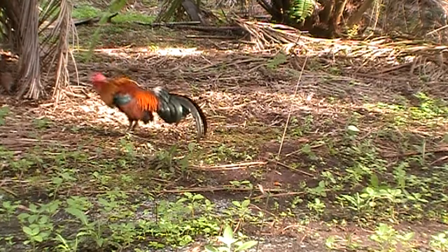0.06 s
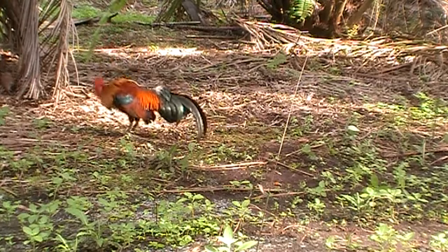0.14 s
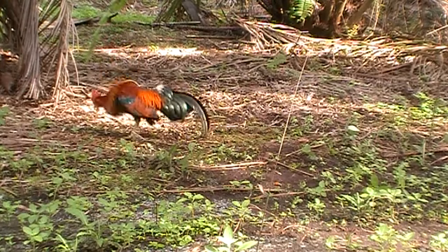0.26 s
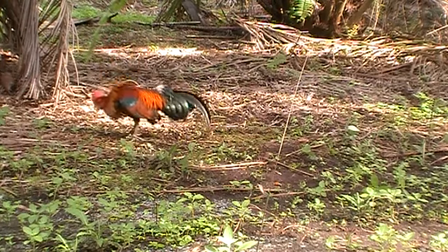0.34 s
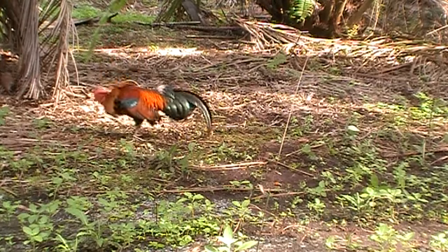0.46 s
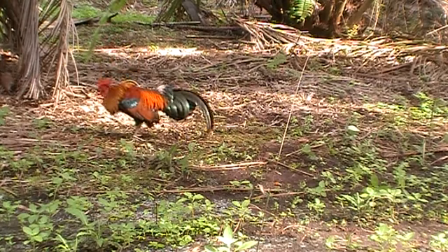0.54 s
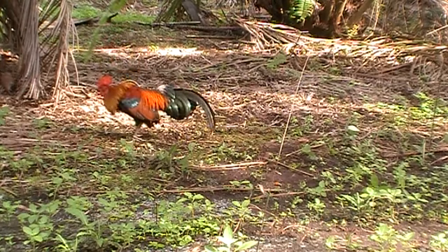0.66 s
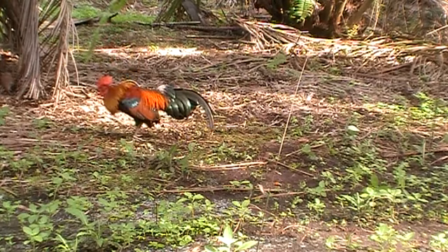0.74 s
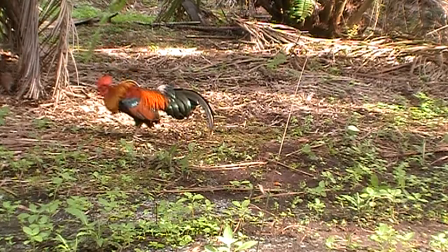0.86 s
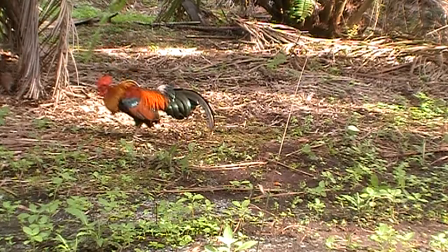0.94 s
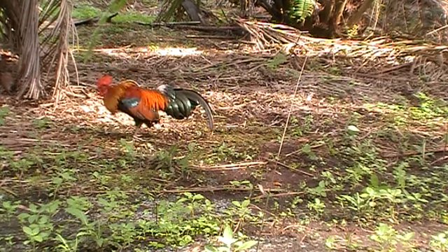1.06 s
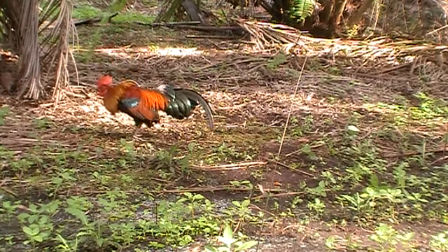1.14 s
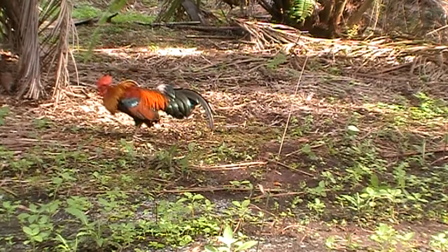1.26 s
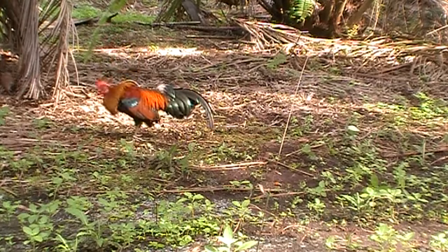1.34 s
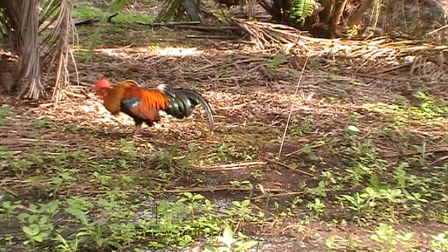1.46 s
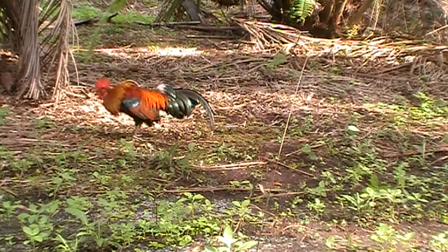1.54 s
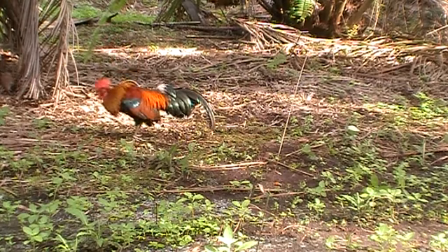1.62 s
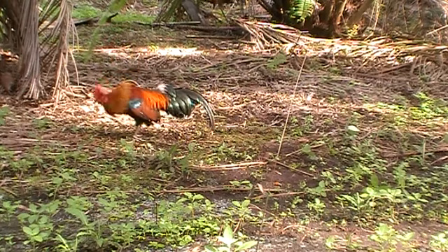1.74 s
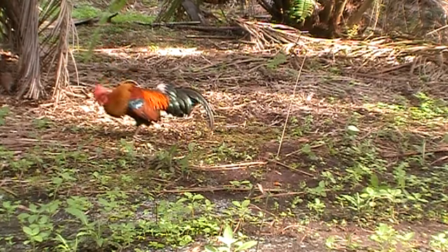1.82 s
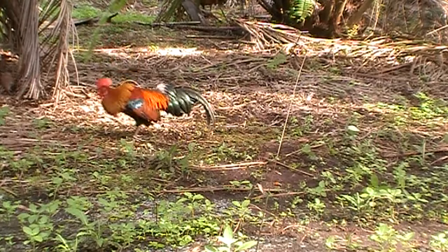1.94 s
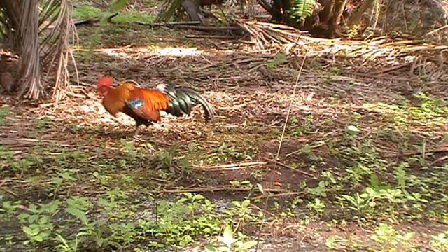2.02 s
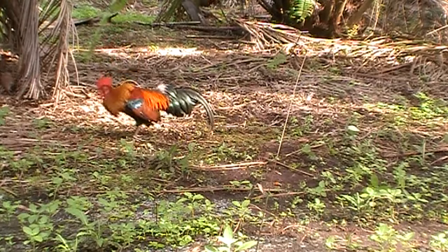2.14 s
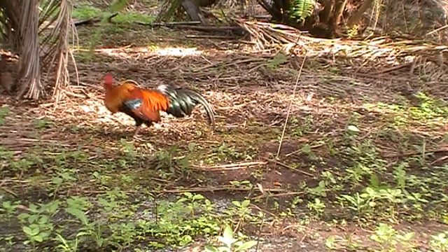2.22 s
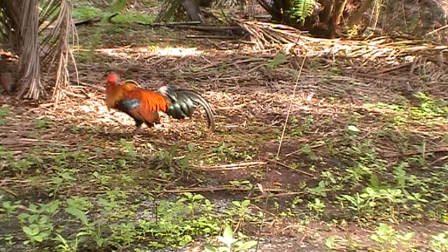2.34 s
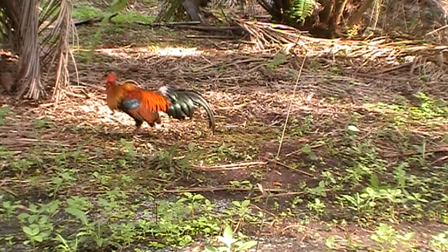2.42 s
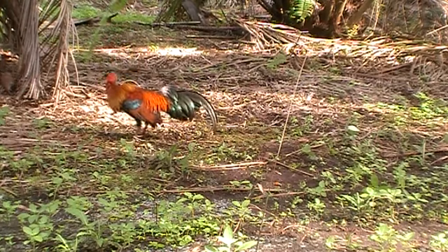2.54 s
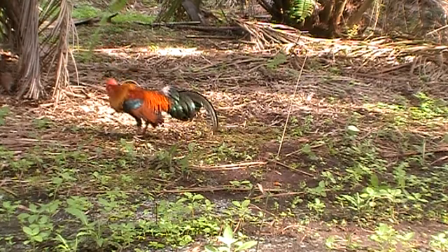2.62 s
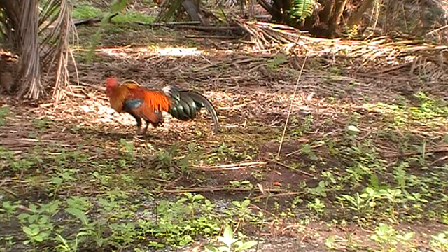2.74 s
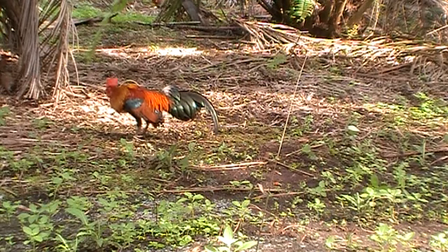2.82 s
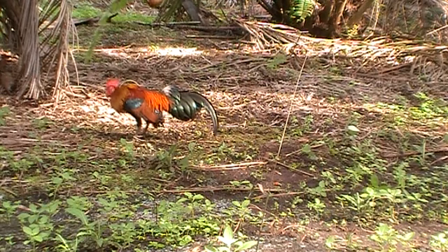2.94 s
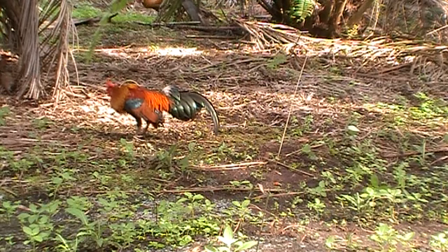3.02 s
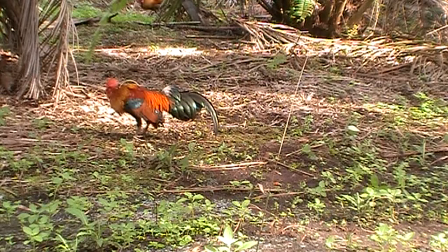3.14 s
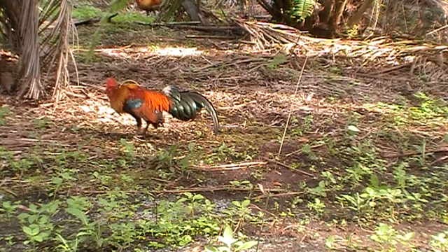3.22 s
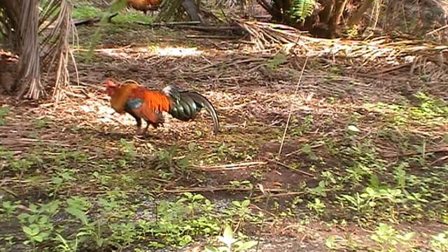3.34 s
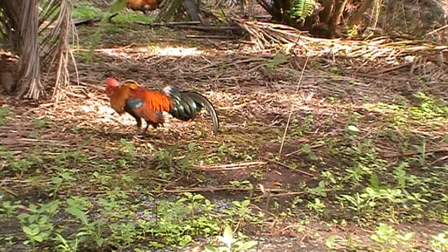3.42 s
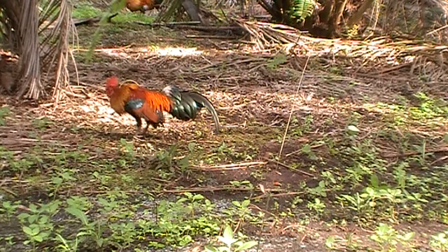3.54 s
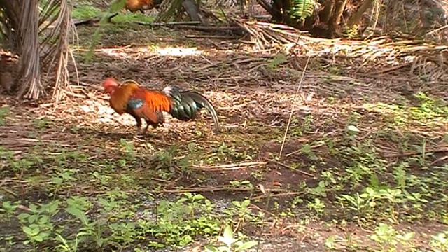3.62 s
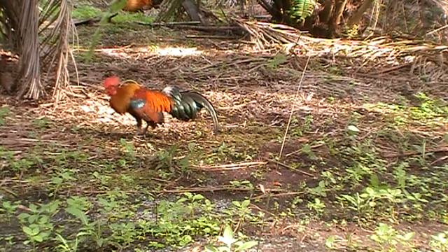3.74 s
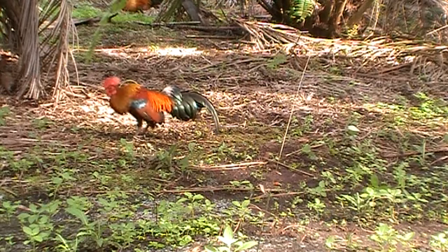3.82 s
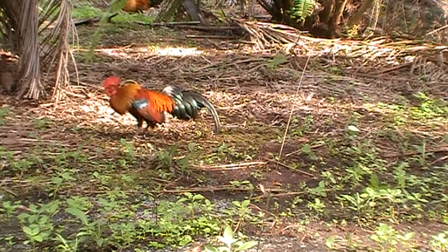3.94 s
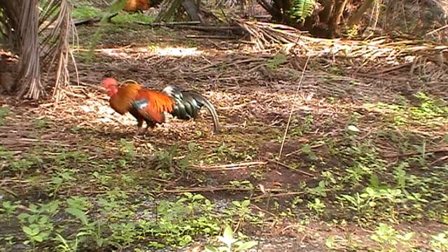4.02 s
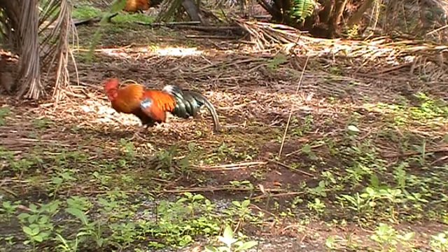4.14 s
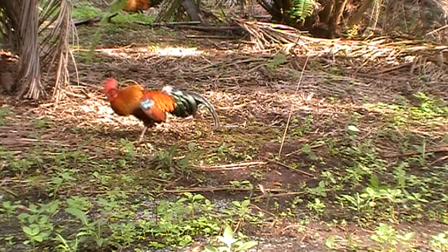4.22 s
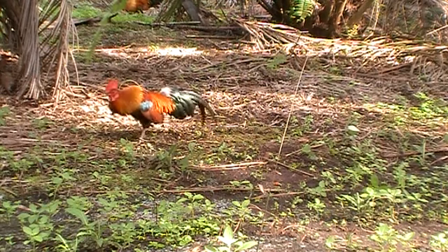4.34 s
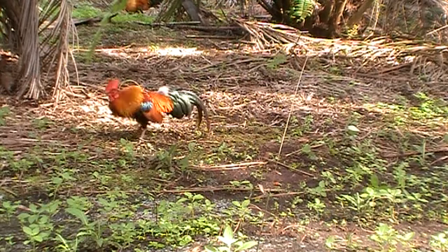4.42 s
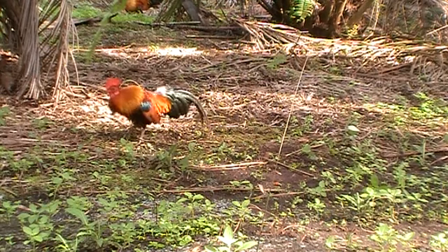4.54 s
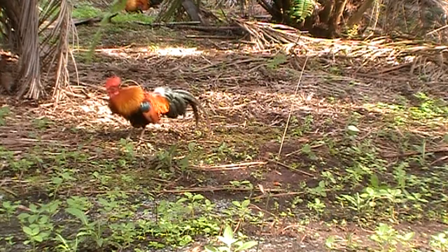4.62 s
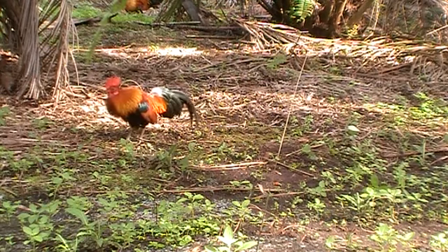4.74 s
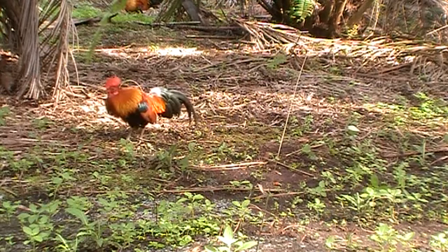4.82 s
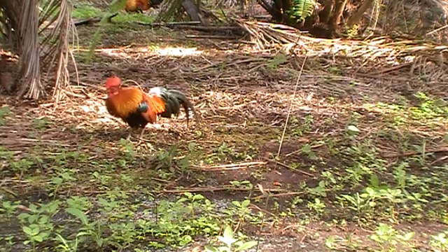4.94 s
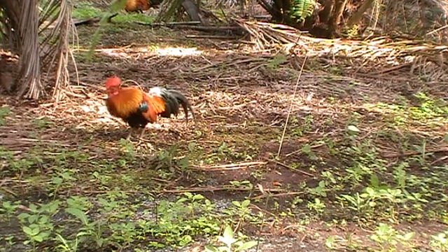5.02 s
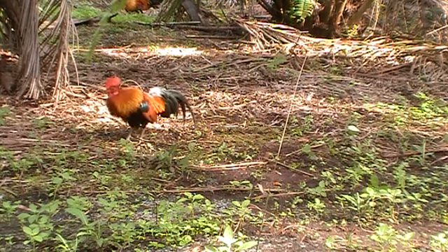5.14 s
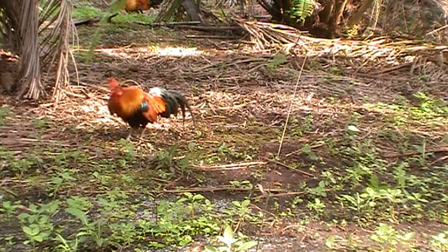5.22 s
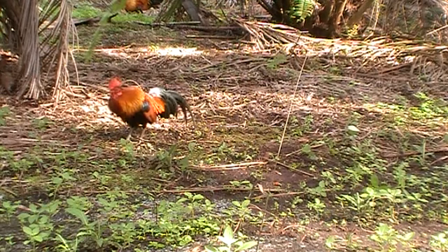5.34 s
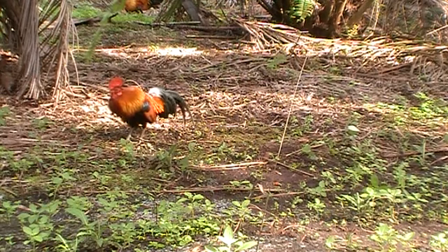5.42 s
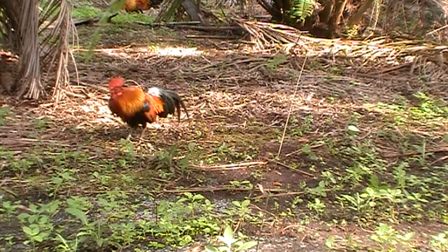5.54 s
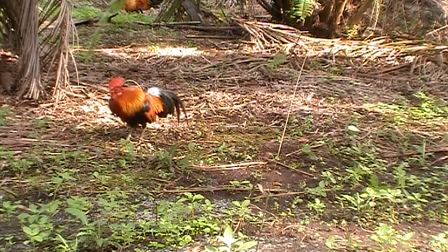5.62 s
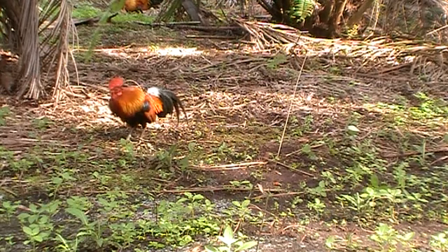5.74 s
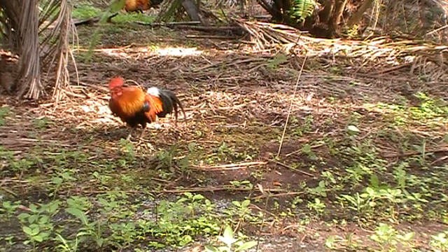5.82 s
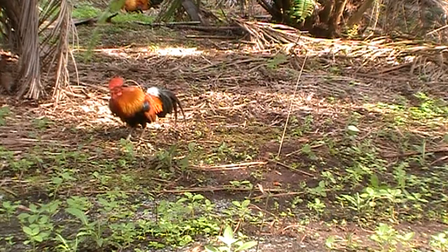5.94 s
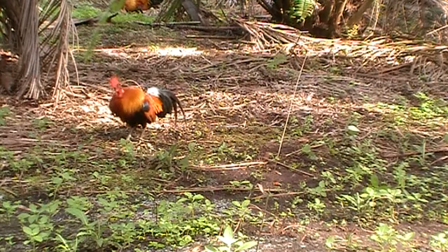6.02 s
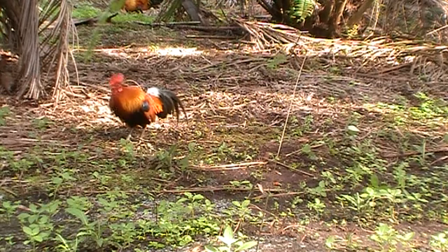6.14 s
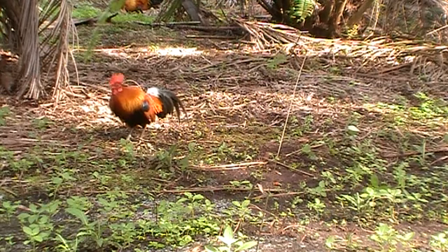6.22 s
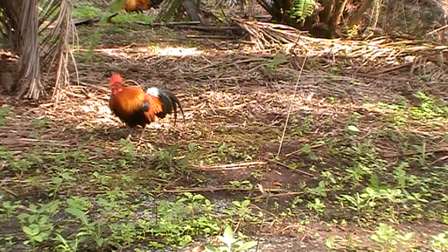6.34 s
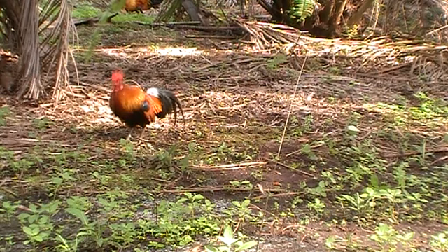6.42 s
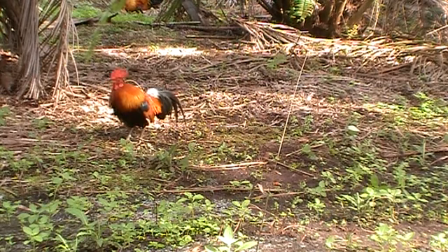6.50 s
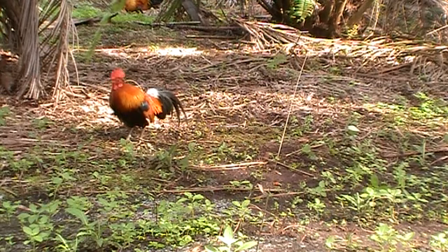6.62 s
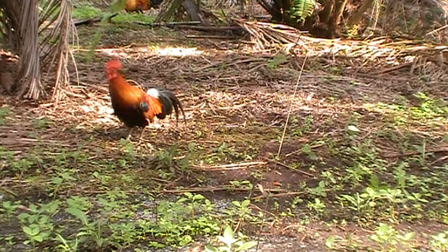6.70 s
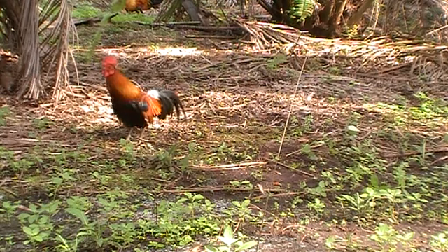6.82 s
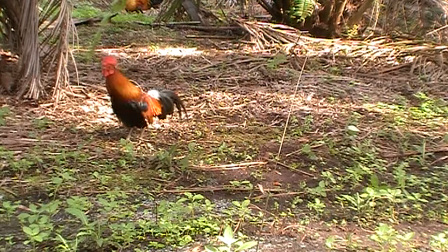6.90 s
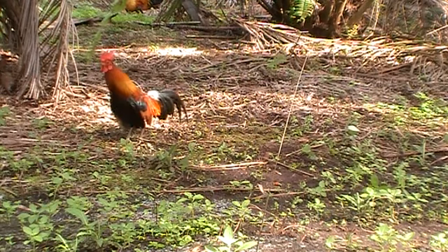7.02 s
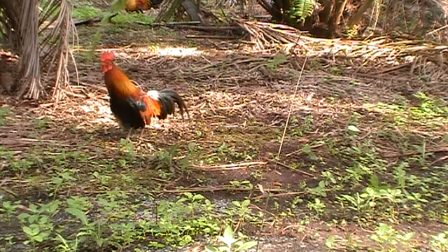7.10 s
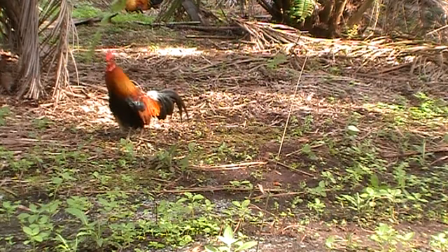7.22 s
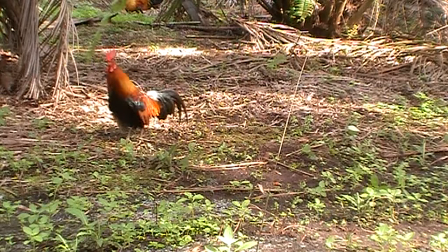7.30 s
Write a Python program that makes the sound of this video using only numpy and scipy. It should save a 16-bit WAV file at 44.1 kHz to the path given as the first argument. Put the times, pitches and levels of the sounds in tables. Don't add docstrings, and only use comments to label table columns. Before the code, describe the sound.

Shrill cicadas and katydids sing in a forest as a dove throbs, leaves crackle, and a nearby rooster clucks, then gives sharp alarm notes.

```python
import sys
import numpy as np
from scipy import signal
from scipy.fft import rfft, irfft
from scipy.io import wavfile
from scipy.ndimage import uniform_filter1d

SR = 44100
rng = np.random.default_rng(int(sys.argv[2]) if len(sys.argv) > 2 else 0)


def voltage_ratio(level):
    return 10 ** (np.asarray(level, float) / 20)


def bounce(signal):
    frames = np.transpose(np.atleast_2d(signal))
    limited = np.clip(frames, -1, 1)
    pcm = np.round(limited * 32767).astype(np.int16)
    wavfile.write(sys.argv[1], SR, pcm)


N = 325017


def rms_one(x):
    return x / np.sqrt(np.mean(x ** 2) + 1e-20)


def in_time(rows):
    s, *columns = np.transpose(rows)
    return [np.interp(np.arange(N) / SR, s, c) for c in columns]


def drift(rate):
    r = np.exp(-80 * np.pi * rate / SR)
    slow = signal.lfilter([1], [1, -2 * r, r * r], rng.standard_normal(N // 40 + 2002))[2000:]
    return np.interp(np.arange(N) / 40, np.arange(len(slow)), rms_one(slow))


def resonance(x, hz, width_hz):
    r = np.exp(-np.pi * width_hz / SR)
    feedback = [1, -2 * r * np.cos(2 * np.pi * hz / SR), r * r]
    return signal.lfilter([(1 - r * r) / 2, 0, (r * r - 1) / 2], feedback, x)


def steep_resonance(x, hz, width_hz):
    return rms_one(resonance(resonance(x, hz, width_hz), hz, 2 * width_hz))


def band(x, low_hz, high_hz):
    return signal.sosfilt(signal.butter(4, [low_hz, high_hz], "band", fs=SR, output="sos"), x)


def add(out, s, sound):
    i = round(s * SR)
    out[i:i + len(sound)] += sound[:N - i]


def place(x, left_db, lag):
    late = irfft(rfft(x) * np.exp(-2j * np.pi * lag * np.arange(N // 2 + 1) / N), N)
    return np.array([late * voltage_ratio(left_db / 2), x * voltage_ratio(-left_db / 2)])


def hump(phase, sharp):
    return (.5 + .5 * np.cos(2 * np.pi * phase)) ** sharp


def notes(tables, fade_s):
    t = np.arange(N) / SR
    gate = sum(np.clip(np.minimum(t - n[0][0], n[-1][0] - t) / fade_s, 0, 1) for n in tables)
    hz, level_db, *_ = in_time([row for n in tables for row in n])
    return hz, gate * voltage_ratio(level_db)


def forest(x, t60):
    t = np.arange(round(.7 * SR)) / SR
    tail = rng.standard_normal((2, len(t))) * voltage_ratio(-60 * t / t60) * (t > .006)
    tail = signal.lfilter([.3], [1, -.7], tail)
    return signal.fftconvolve(x[None], tail / np.sqrt(np.sum(tail ** 2) / 2), axes=1)[:, :N]


def shaped_noise(curve):
    hz, db = np.transpose(curve)
    log_hz = np.log(np.arange(N // 2 + 1) * SR / N + 1)
    return irfft(rfft(rng.standard_normal(N)) * voltage_ratio(np.interp(log_hz, np.log(hz), db)), N)


def air():
    # pitch in Hz, level in dB per Hz.
    alike = [(20, -10), (35, -21), (50, -4), (100, -6.5), (190, -7), (260, -18), (1000, -22.5),
             (2000, -25.5), (3900, -34.5), (4500, -23.5), (5800, -20.5), (6170, -25), (6400, -18),
             (8000, -19), (11300, -16), (12200, -27), (12800, -22), (13700, -11.5), (15500, -23.5)]
    # pitch in Hz, level in dB per Hz.
    opposite = [(20, -39), (50, -9), (100, -14.5), (190, -8), (350, -10.5), (1000, -15.5), (3800, -28.5),
                (4500, -22), (6200, -16), (7600, -47), (8400, -42), (12600, -25), (13700, -7.5),
                (15500, -58)]
    mid, side = shaped_noise(alike), shaped_noise(opposite)
    right_rumble = place(resonance(mid, 72, 61), left_db=-60.0, lag=0) * 0.043
    return voltage_ratio(-50) / np.std(mid) * (np.array([mid + side, mid - side]) + right_rumble)


def breeze():
    # time in seconds, level in dB.
    stirring = [
        (0.0, -66),
        (0.35, -60),
        (5.34, -61),
        (5.81, -55),
        (6.28, -57),
        (6.78, -57),
        (6.82, -52),
        (6.96, -57),
        (7.37, -86),
    ]
    hiss = rms_one(band(rng.standard_normal((2, N)), 2170, 4600))
    return voltage_ratio(in_time(stirring)[0] - 9.0) * hiss


def cicada(noise_db, tone_db):
    # time in seconds, level in dB.
    loudness = [
        (0, -45),
        (2.5, -45),
        (7.37, -44),
    ]
    pulse_db = [-8, -11.5, -12.5, -7.5]
    # time in seconds, throbs per second.
    pace = [(0, 20.18), (1.2, 18.48), (1.4, 19.73), (2.4, 18.47), (2.7, 19.27), (4.4, 19.52), (4.8, 20.07),
            (6.7, 21.21), (6.85, 20.22), (7.3, 20.03)]
    beat = -.29 + np.cumsum(in_time(pace)[0]) / SR
    pulse = 4 * (beat - .85)
    strength = voltage_ratio(np.array(pulse_db)[np.round(pulse - 1).astype(int) % 4])
    clicks = np.diff(np.floor(2 * pulse + .5 + .05 * drift(60)), prepend=0) > 0
    noise = voltage_ratio(noise_db) * (.8 + hump(pulse, sharp=1.5)) * rng.standard_normal(N)
    drive = strength * (8. * clicks + noise)
    body = rms_one(band(resonance(drive, 6840, 465), 6547, 7640))
    tone = np.sin(2 * np.pi * np.cumsum(6838 + 14 * drift(20.37)) / SR)
    swell = hump(pulse, sharp=0.3) * (0.5 + hump(2 * pulse + .5, sharp=1.3))
    body = rms_one(body + voltage_ratio(tone_db) * rms_one(band(tone * strength * swell, 5500, 10800)))
    overtone = rms_one(band(resonance(body ** 2, 13700, 900), 14800, 15200))
    return voltage_ratio(in_time(loudness)[0]) * (body + voltage_ratio(-38.0) * overtone)


def cicadas():
    near = place(cicada(noise_db=-2, tone_db=-2.0), left_db=-5.0, lag=-2.0)
    chorus = np.array([cicada(noise_db=32, tone_db=-27.0), cicada(noise_db=20, tone_db=-20.5)])
    return near * voltage_ratio(1.5) + voltage_ratio(-3.5) * chorus


def stridulation(per_s, hz, sweep, sharp, rough_hz):
    stroke = per_s * np.arange(N) / SR + 0.045 * drift(2.5)
    slide = hz * (1 - sweep * ((stroke + .5) % 1 - .5))
    tooth = resonance(rng.standard_normal(N), 30, rough_hz)
    wing = np.sin(2 * np.pi * np.cumsum(slide * (1 + 0.013 * drift(147.2))) / SR)
    return rms_one(hump(stroke, sharp) * (1 + .5 * rms_one(tooth)) * wing)


def phrases(rows, rest, hold, stop_s):
    stops, low_db, full_db = np.transpose(rows)
    starts = np.append(2 * stops[0] - stops[1], stops[:-1])
    span = stops - starts
    s = np.transpose([starts + stop_s, starts + stop_s + rest * span, stops - hold * span, stops - stop_s])
    db = np.transpose([low_db, low_db, full_db - 1.0, full_db])
    return voltage_ratio(np.interp(np.arange(N) / SR, s.ravel(), db.ravel()))


def katydids():
    # stop in seconds, resting level before in dB, full level in dB.
    steady = [(.40, -58, -48.5), (1.17, -54.5, -49), (1.87, -55.5, -47.5), (2.56, -56.5, -48.5),
              (3.24, -58, -48), (3.985, -56, -48), (4.70, -57.5, -48), (5.42, -62.5, -48), (6.13, -60, -48),
              (6.80, -60, -48), (7.24, -58, -53.5), (8.0, -59, -50)]
    # stop in seconds, resting level before in dB, full level in dB.
    sweeping = [
        (.3, -59, -56.5),
        (1.38, -64, -55),
        (2.40, -68, -55),
        (3.45, -66, -55),
        (4.49, -67, -56),
        (5.52, -68, -56),
        (6.85, -88, -54.5),
        (8.0, -68, -59),
    ]
    katydid = stridulation(138.2, 10780, sweep=0.028, sharp=0.65, rough_hz=475)
    sweeper = stridulation(91.4, 9300, sweep=0.18, sharp=0.6, rough_hz=400)
    both = phrases(steady, rest=0.24, hold=0.42, stop_s=0.0073) * katydid
    both = both + phrases(sweeping, rest=.03, hold=0.067, stop_s=.025) * sweeper
    return place(band(both, 7000, 11350), left_db=7.5, lag=0)


def crickets():
    # middle in seconds, length in seconds, full level in dB.
    bout_rows = [
        (.25, 2.9, -59.5),
        (2.602, 1.7, -57.5),
        (4.005, 2.1, -60.5),
        (6.59, 1.9, -58.5),
    ]
    # start in seconds, peak in dB.
    chirps = [
        (0.128, -46),
        (0.872, -45),
        (2.05, -44),
        (2.748, -43.5),
        (3.524, -42.5),
        (4.83, -49),
        (5.42, -43.5),
        (6.258, -44.5),
    ]
    t = np.arange(N) / SR
    bouts = sum(voltage_ratio(db) * hump(np.clip((t - s) / length, -.5, .5), sharp=0.68) for s, length, db in bout_rows)
    ringing = resonance(resonance(rng.standard_normal(N), 4790, 95), 4750, 200)
    cricket = (voltage_ratio(-84) + bouts) * rms_one(ringing)
    gate = np.zeros(N)
    for s, peak_db in chirps:
        add(gate, s, voltage_ratio(peak_db - 7) * np.linspace(.5, 1.3, round(.11 * SR)))
    chirper = gate * stridulation(93, 5280, sweep=0.03, sharp=4, rough_hz=20)
    return place(cricket + chirper, left_db=0.5, lag=-3.0)


def leaves():
    # start in seconds, peak in dB, centre in Hz, length in seconds, width in Hz.
    rustles = [(0.541, -52.5, 1830, 0.076, 400), (0.55, -57, 2450, 0.084, 345),
               (0.295, -72, 1090, 0.34, 190), (0.543, -66, 1130, 0.3, 220),
               (2.306, -57.5, 2770, 0.062, 1188), (3.428, -57.5, 1850, 0.12, 885.6),
               (3.45, -59.5, 990, 0.33, 140), (4.079, -55, 1010, 0.31, 970),
               (4.895, -52.5, 1050, 0.19, 260), (5.098, -57.5, 990, 0.41, 300), (5.2, -58, 1460, 0.31, 500),
               (5.253, -53, 950, 0.33, 221), (5.354, -53.5, 2300, 0.17, 1404), (5.362, -53, 600, 0.03, 500),
               (5.614, -56.5, 2940, .27, 2000), (5.839, -52, 2020, 0.13, 1194),
               (5.978, -56, 1300, 0.046, 1500), (5.998, -58, 3180, 0.17, 1667),
               (6.159, -61, 1140, 0.33, 250), (6.242, -60, 2760, 0.43, 2268), (6.383, -44, 746, 0.031, 560),
               (6.506, -52, 1750, 0.13, 1728), (3.581, -49, 1520, .012, 500),
               (3.595, -44.5, 1000, 0.0093, 500), (3.592, -53, 2200, .008, 1200),
               (3.848, -58, 1070, .012, 900), (5.975, -46, 600, 0.014, 600), (6.612, -52, 350, 0.017, 200),
               (3.659, -55, 450, 0.084, 250), (5.36, -62.5, 1400, 0.21, 40), (6.139, -53, 1140, .015, 400)]
    # start in seconds, peak in dB.
    snaps = [
        (3.5887, -26),
        (4.0525, -19),
    ]
    out, ticks = np.zeros(N), np.zeros(N)
    for s, peak_db, hz, length, width_hz in rustles:
        u = np.linspace(0, 1, min(round(max(length, .005) * SR), 12000))
        grains = rng.standard_normal(12000) * (rng.random(12000) < .2)
        crackle = rms_one(resonance(resonance(grains, hz, width_hz), hz, width_hz))
        add(out, s, voltage_ratio(peak_db) * np.sin(np.pi * u ** 0.52) * crackle[:len(u)])
    for s, peak_db in snaps:
        add(ticks, s, voltage_ratio(peak_db - 8.5) * rng.standard_normal(300) * np.exp(-np.arange(300) / 60.))
    return place(out, left_db=-3.5, lag=-5.0) + band(ticks, 7500, 14000)


def peeps():
    # start in seconds, peak in dB, pitch in Hz, length in seconds.
    whistles = [(0.188, -62, 1044, 0.015), (0.272, -58, 964, 0.017), (0.358, -66, 1010, 0.024),
                (0.485, -67, 1140, 0.027), (0.633, -63, 1090, 0.012), (0.687, -66, 1196, 0.059),
                (0.753, -66.5, 1108, 0.05), (0.809, -70, 1004, 0.026), (1.006, -67, 1190, 0.038),
                (1.184, -61, 1034, 0.012), (1.262, -57.5, 1000, 0.016), (1.354, -61, 920, 0.014),
                (1.468, -64, 904, 0.03), (1.57, -64, 874, 0.0085), (2.279, -56.5, 990, 0.025),
                (2.376, -60.5, 890, 0.022), (2.492, -62, 876, 0.022), (3.239, -71, 1170, 0.057),
                (3.3, -65.5, 1147, 0.053), (3.379, -64, 1214, 0.066), (3.465, -70, 1130, 0.062),
                (3.56, -68, 1050, 0.14), (3.639, -64, 897, 0.035), (3.738, -60.5, 887, 0.02),
                (5.035, -57, 1040, 0.019), (5.527, -56.5, 820, 0.039), (5.716, -51, 1070, 0.011),
                (6.005, -65, 987, 0.048), (.375, -69, 900, 0.021), (.41, -70, 1193, 0.054),
                (.485, -69, 890, .02), (.555, -67, 1043, .025), (.88, -69, 957, 0.023),
                (.99, -73, 1040, 0.018), (1.041, -73, 1090, .025), (3.216, -66, 965, .02),
                (4.245, -60, 1120, .02), (6.31, -57, 1094, 0.032), (6.581, -65, 1050, 0.014),
                (6.758, -53.5, 1135, 0.021)]
    out = np.zeros(N)
    for s, peak_db, hz, length in whistles:
        u = np.linspace(0, 1, round(max(length, .01) * SR))
        tone = np.sin(2 * np.pi * np.cumsum(hz * (1.03 - 0.173 * u ** 2)) / SR)
        add(out, s, voltage_ratio(peak_db + 7.5) * np.sin(np.pi * u) * tone)
    return out


def far_crow():
    # time in seconds, pitch in Hz, level in dB, then octave and
    # half-step tone in dB against the main tone.
    crow = [
        [(4.32, 899, -55, -12, -24), (4.36, 922, -55, -14, -20), (4.53, 932, -58, -8, -18),
         (4.58, 918, -52, -20, -12), (4.78, 915, -52, -17, -10), (4.9, 944, -58, -11, -8),
         (5.0, 981, -61, -13, -16), (5.12, 1002, -65, -14, -18), (5.23, 1020, -60, -16, -18)],
        [(5.24, 900, -58, -20, -26), (5.33, 940, -58, -16, -26), (5.4, 995, -53, -8, -26),
         (5.55, 985, -57, -9, -24), (5.7, 960, -59.5, -20, -26)],
        [(5.72, 1050, -48, -20, -26), (5.76, 948, -74, -20, -26), (5.84, 850, -58, -20, -26)],
    ]
    hz, gain = notes(crow, fade_s=0.019)
    octave_db, half_db = in_time([row for n in crow for row in n])[2:]
    phase = 2 * np.pi * np.cumsum(hz * (1 + .006 * drift(43.5))) / SR
    tones = [(1, 0), (1.5, half_db), (2, octave_db)]
    return gain * sum(voltage_ratio(db + 3.5 * drift(50)) * np.sin(k * phase) for k, db in tones)


def trill():
    # throbs per second at first, gain in rate per second,
    # depth from 0 to 1, seconds until they die out.
    throbbing = [
        (74, 0., .55, .125),
        (28.5, 154, .92, .31),
    ]
    first_throbs = [
        (1.744, 2.062),
        (3.84, 4.171),
        (5.962, 6.288),
    ]
    lasting = [1.0, .97, .85]
    t, count, depth = np.arange(N) / SR, np.zeros(N), np.zeros(N)
    for firsts, share in zip(first_throbs, lasting):
        for s, (per_s, gain, deep, last) in zip(firsts, throbbing):
            u = t - s
            on = (u > -.04) & (u < last)
            count += on * (per_s * u + .5 * gain * u * u)
            depth += on * deep * (1 - np.clip(u / (last * share), 0, 1) ** 7.0)
    return count, depth


def dove():
    # seconds after note start, pitch in Hz, level in dB.
    coo_notes = [
        [(0, 473.8, -66), (.023, 571.5, -44.5), (.045, 610.3, -41), (.067, 557, -43.5), (.078, 499.7, -53)],
        [(0, 522.2, -50.5), (.035, 558.8, -49.5), (.07, 579, -42.5), (.11, 597.7, -39.5), (.145, 660.4, -38.5),
         (.165, 599.2, -39), (.185, 552.3, -48.5)],
        [(0, 658.4, -42.5), (.06, 757.7, -33), (.16, 700, -34.5), (.24, 645, -35), (.3, 612, -35.5),
         (.345, 603, -36.5), (.358, 572, -40.5), (.4, 550, -44), (.46, 480, -58)],
    ]
    # start in seconds, stretch in time.
    coo_starts = [
        [(1.495, 0.99), (1.73, 0.88), (2.05, 1.0)],
        [(3.603, 0.92), (3.83, 0.95), (4.16, .96)],
        [(5.72, 0.95), (5.955, 0.9), (6.275, 0.99)],
    ]
    coo_db = [
        [.1, .1, -.3],
        [.1, .1, -.3],
        [-.3, -.3, -1.5],
    ]
    octave_db = [-69, -68, -69]
    sung = []
    for coo, extra_db in zip(coo_starts, coo_db):
        for (s, stretch), more, note in zip(coo, extra_db, coo_notes):
            sung.append([(s + stretch * u, hz, db + more) for u, hz, db in note])
    first_notes = [[(s, hz, db) for s, hz, _ in note] for note, db in zip(sung[::3], octave_db)]
    _, octave = notes(first_notes, fade_s=0.0031)
    hz, gain = notes(sung, fade_s=0.0016)
    count, depth = trill()
    turn = 2 * np.pi * count
    slide = 1 + depth ** 2 * (0.049 * np.sin(turn) + 0.13 * (np.cos(turn) - .7))
    phase = 2 * np.pi * np.cumsum(hz * slide * (1 + .025 * depth * drift(90))) / SR
    opening = np.tanh(3.0 * hump(count + .025 * drift(40), sharp=3.2))
    throb = 1 - depth + 0.85 * depth * opening * voltage_ratio(1.0 * drift(45))
    throb = throb * voltage_ratio(0.9 * drift(48))
    octave = octave + voltage_ratio(-51.0) * np.sqrt(gain)
    return voltage_ratio(1.0) * throb * (gain * np.sin(phase) + octave * np.sin(2 * phase))


def calls(events, throat, fall_s, boost_db, swell, uneven):
    out, t = np.zeros(N), np.arange(round(.12 * SR)) / SR
    for s, peak_db, hz, rise, hold, rough in events:
        wobble = np.interp(t, t[::128], rng.standard_normal(len(t[::128])))
        cycles = np.cumsum(hz * (1 - 2.0 * np.abs(t - rise) + 0.046 * rough * wobble)) / SR
        pulses = np.diff(np.floor(cycles), prepend=0) * voltage_ratio(1.4 * rough * wobble)
        pulses = pulses * (1 + uneven * (-1) ** np.floor(cycles))
        source = pulses + 0.8 * rough * hump(cycles, sharp=0.5) * rng.standard_normal(len(t))
        voice = np.zeros(len(t))
        for k, (f, width_hz, db) in enumerate(throat):
            voice += voltage_ratio(db) * (-1) ** k * steep_resonance(source, f, width_hz)
        opening = 0.38 * np.minimum(t / 0.0017, 1) + 0.79 * np.minimum(t / rise, 1) ** swell
        fall = np.maximum(t - rise - hold, 0) / fall_s + 0.79 * np.maximum(t - rise, 0) / hold
        add(out, s, voltage_ratio(peak_db + boost_db) * opening * np.exp(-fall) * rms_one(voice))
    return out


def clucks():
    # start in seconds, peak in dB, rise in seconds, hold in seconds.
    soft = [(4.307, -43.5, 0.0085, 0.0092), (4.451, -42, 0.0073, 0.0063), (4.571, -38.5, 0.01, 0.026),
            (4.665, -37.5, 0.014, 0.0077), (4.793, -36, 0.0043, 0.0087), (4.806, -35, 0.0029, 0.0066),
            (4.817, -36.5, 0.016, 0.015), (4.839, -43, 0.014, 0.016), (4.869, -37, 0.012, 0.021),
            (4.932, -45, 0.0043, .008), (4.943, -35, 0.0073, 0.0097)]
    # resonance in Hz, width in Hz, level in dB.
    cluck_throat = [(350, 160, -3.5), (600, 240, -2), (1050, 270, -12), (1400, 580, -17.5)]
    # start in seconds, peak in dB, roughness from 0 to 1.
    bright = [
        (4.003, -37, 0.69),
        (4.1657, -33.5, 0.06),
    ]
    # resonance in Hz, width in Hz, level in dB.
    tut_throat = [(322, 230, -2), (775, 480, -3.5), (1380, 290, -3.5), (2730, 880, -8.5)]
    # start, dB, pitch in Hz, rise and hold in seconds, roughness
    low = [(s, db, 293, rise, hold, .2) for s, db, rise, hold in soft]
    tuts = [(s, db, 292, 0.0036, 0.0082, rough) for s, db, rough in bright]
    out = calls(low, cluck_throat, fall_s=0.003, boost_db=0.5, swell=0.42, uneven=.05)
    return out + calls(tuts, tut_throat, fall_s=0.031, boost_db=-5.0, swell=0.79, uneven=0.046)


def alarms():
    # time in seconds, level in dB, roughness from 0 to 1.
    efforts = [
        [(6.7828, -43, 0.88), (6.784, -22.5, 0.88), (6.7915, -21, 0.65), (6.793, -13.5, .15),
         (6.8, -10.5, 0.23), (6.803, -15, 0.58), (6.81, -20.5, 0.78), (6.82, -25.5, 0.7), (6.83, -33.5, 0.57)],
        [(6.9925, -26, 0.82), (6.996, -22.5, 0.77), (7.0015, -19, 0.54), (7.003, -8.5, 0.03),
         (7.006, -14, 0.18), (7.013, -18, 0.25), (7.017, -28, 0.54), (7.025, -27, 0.5), (7.035, -38, 0.65)],
        [(7.176, -56, 0.5), (7.178, -29.5, 0.37), (7.185, -19, 0.27), (7.19, -23, 0.44), (7.2, -25, 0.56),
         (7.204, -25, 0.44), (7.212, -45, 0.63), (7.222, -46, 0.56)],
        [(7.3545, -52, 0.1), (7.357, -31, 0.15), (7.363, -30, 0.45), (7.38, -35, 0.42)],
    ]
    # pulse rate in Hz, accent from 0 to 1 on the first pulse of a group.
    pulse_rows = [
        (1359, 0.88),
        (1329, 0.58),
        (1412, 0.93),
        (1360, .2),
    ]
    groups = [4, 2, 3, 2]
    # resonance in Hz, width in Hz.
    throat = [(430, 340), (700, 240), (960, 220), (1345, 190), (1830, 350), (2350, 186), (2680, 470),
              (3250, 560), (4250, 440), (5000, 900), (8200, 4300), (11300, 3200)]
    # level in dB of each resonance, as the beak opens differently.
    colours = [
        [-30, -12.5, -16.5, 0, -14, -10, -13, -15.5, -14, -13, -24.5, -16],
        [-37, -14, -32, 0.011, -13.5, -13, -17, -23, -14.5, -20, -29.5, -20.5],
        [-20, -25.5, -4.5, 0, -16.5, -3.5, -26, -14.5, -12, -16, -30, -16.5],
        [-36, -36, -22, 0, -16, -12, -23, -19, -9.5, -26, -28, -24],
    ]
    out, t = np.zeros(N), np.arange(round(.12 * SR)) / SR
    for rows, (hz, accent), group, colour in zip(efforts, pulse_rows, groups, colours):
        s, db, rough = np.transpose(rows)
        rough = np.clip(np.interp(t, s - s[0], rough), 0, 1)
        noise = rng.standard_normal((2, len(t)))
        wobble = np.interp(t, t[::64], noise[0, ::64])
        cycles = np.cumsum(hz * (1 + 0.15 * rough * wobble)) / SR
        first = np.floor(cycles) % group == 0
        pulses = np.diff(np.floor(cycles), prepend=0) * (1 + 2 * accent * first)
        source = (1 - 0.51 * rough) * pulses + 0.72 * rough * hump(cycles / group, sharp=1.2) * noise[1]
        breath = voltage_ratio(-3) * np.std(source) * noise[0]
        voice = np.zeros(len(t))
        for k, ((f, width_hz), level_db) in enumerate(zip(throat, colour)):
            upper = f > 1600
            ring = steep_resonance(source + breath * upper, f, width_hz)
            voice += voltage_ratio(level_db + 5.7 * rough * upper) * (-1) ** k * ring
        voice = voice / np.sqrt(uniform_filter1d(voice ** 2, size=200) + 0.022)
        fall_db = 570.0 * np.maximum(t - s[-1] + s[0], 0)
        add(out, s[0], voltage_ratio(np.interp(t, s - s[0], db) - fall_db) * voice)
    return out


def alarm_tones():
    # start in seconds, length in seconds, pitch at start in Hz, pitch at end in Hz, peak in dB.
    tones = [(6.801, 0.026, 1350, 1335, -25), (6.791, 0.0081, 2600, 2780, -21),
             (6.7915, 0.01, 4500, 5050, -26), (6.803, 0.024, 2400, 2250, -26),
             (7.004, 0.046, 1345, 1335, -27), (7.002, 0.031, 2380, 2250, -31),
             (7.18, 0.028, 1380, 1330, -30), (7.182, .031, 2300, 2350, -30),
             (6.7925, .0088, 1330, 1420, -19), (7.177, .012, 1230, 1280, -26), (7.186, .02, 960, 940, -30),
             (7.356, .03, 1360, 1320, -36), (7.357, .03, 4150, 4050, -44)]
    out = np.zeros(N)
    for s, length, first_hz, last_hz, peak_db in tones:
        u = np.linspace(0, 1, round(length * SR))
        glide = np.sin(2 * np.pi * np.cumsum(first_hz + (last_hz - first_hz) * u) / SR)
        add(out, s, voltage_ratio(peak_db) * np.sin(np.pi * u ** 0.57) ** 0.73 * glide)
    return out


def scene():
    far, coo, cluck = far_crow() + peeps(), dove(), clucks()
    alarm = alarms() + alarm_tones()
    background = air() + breeze() + cicadas() + katydids() + crickets() + leaves()
    chest = signal.sosfilt(signal.butter(4, 1800, fs=SR, output="sos"), alarm)
    rooster = place(chest, left_db=-5, lag=-2.4) + place(cluck, left_db=-4.5, lag=-2.5)
    rooster = rooster + place(band(alarm, 1840, 4290), left_db=2.0, lag=-3.0)
    rooster = rooster + place(band(alarm, 5900, 17700), left_db=2.5, lag=0)
    birds = place(far, left_db=-8.5, lag=-4.5) + place(coo, left_db=-6.0, lag=0.0) + rooster
    echo = voltage_ratio(-19.5) * np.roll(coo, round(0.077 * SR))
    to_forest = voltage_ratio(-21) * coo + voltage_ratio(-23.0) * cluck + voltage_ratio(-6.5) * far
    to_forest = to_forest + voltage_ratio(-18.5) * band(alarm, 670, 6900) + voltage_ratio(-7.5) * band(alarm, 2870, 3730)
    return background + birds + echo + forest(to_forest, t60=0.36)


def band_limit(x):
    return signal.sosfilt(signal.butter(12, 15710, fs=SR, output="sos"), x)


def record(dry):
    cut = signal.sosfilt(signal.cheby2(12, 50, 15600, fs=SR, output="sos"), dry)
    return band_limit(cut)


dry = scene()
out = record(dry)
bounce(out)
```